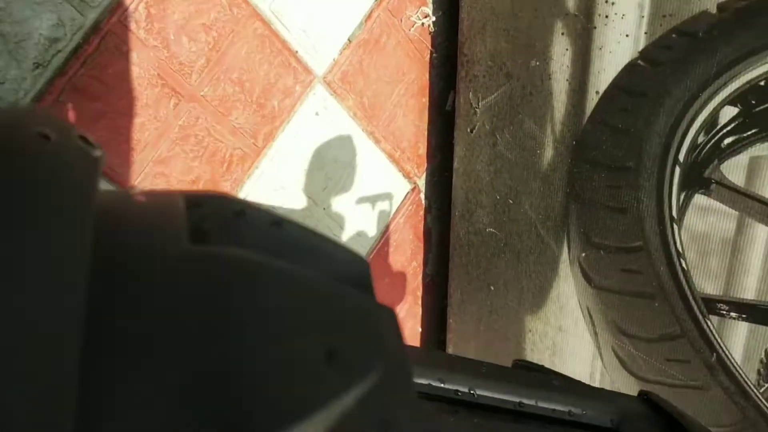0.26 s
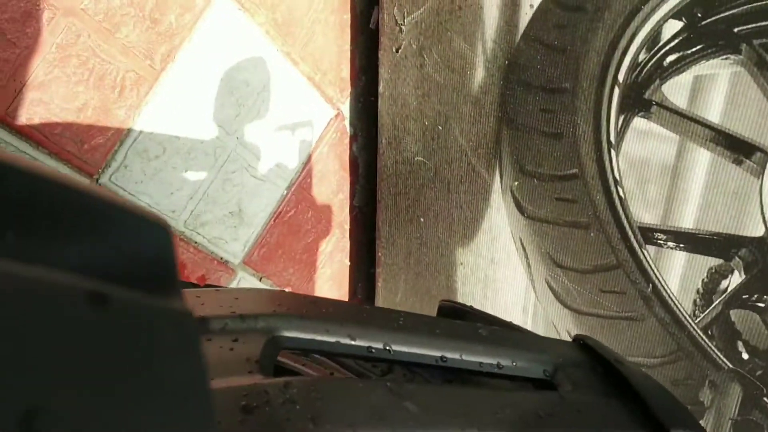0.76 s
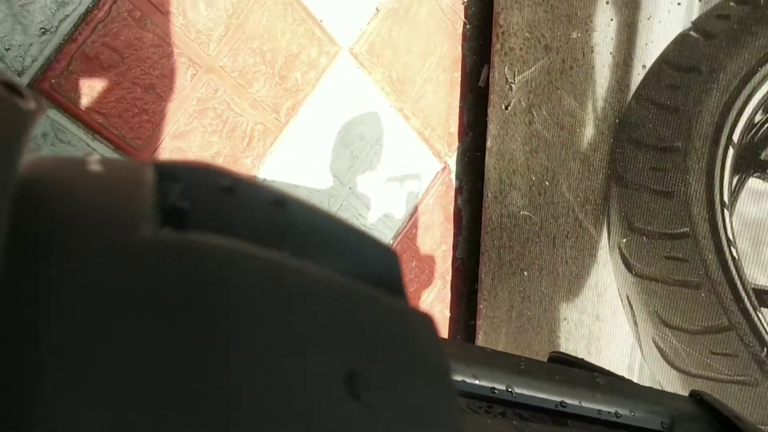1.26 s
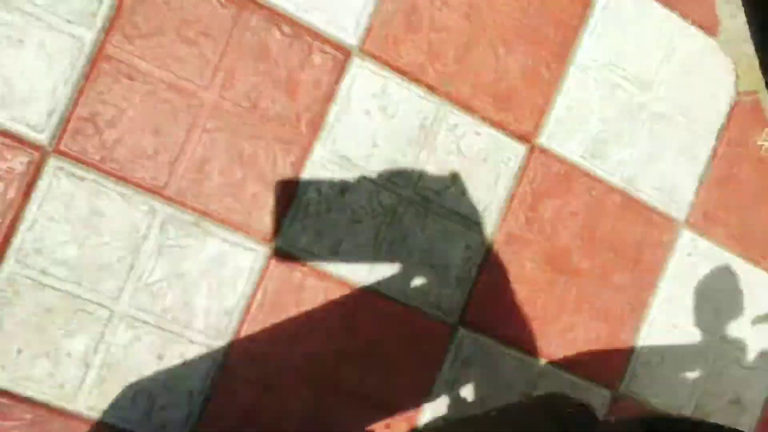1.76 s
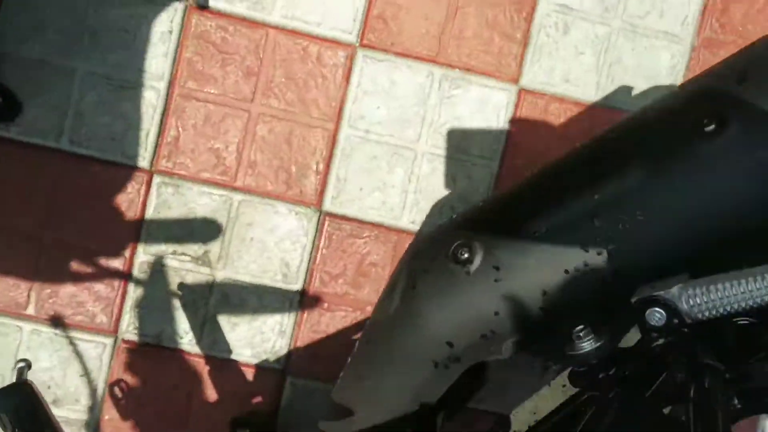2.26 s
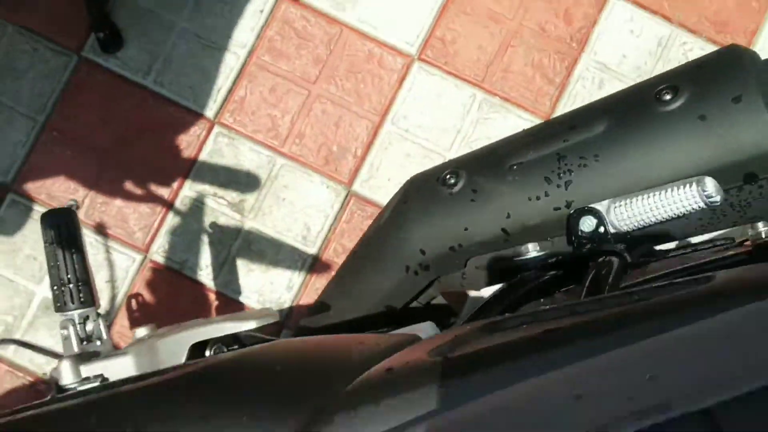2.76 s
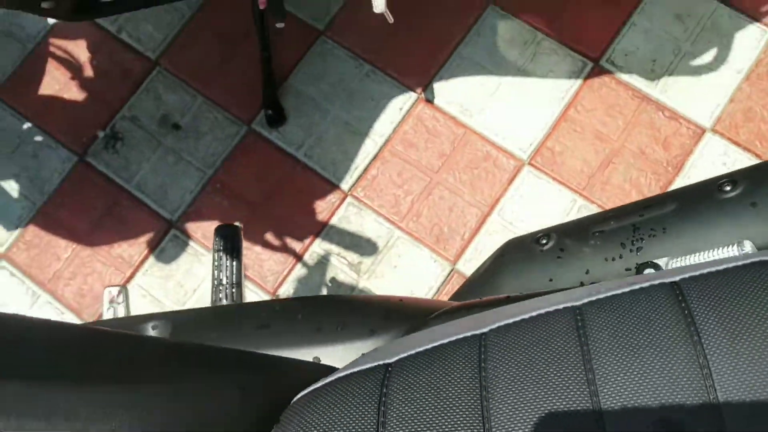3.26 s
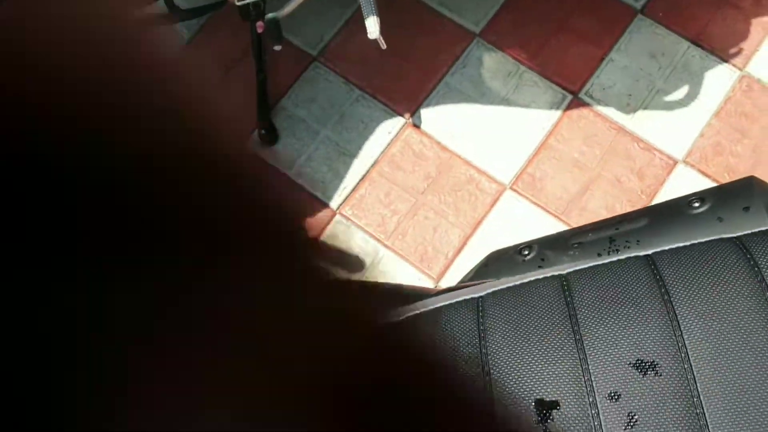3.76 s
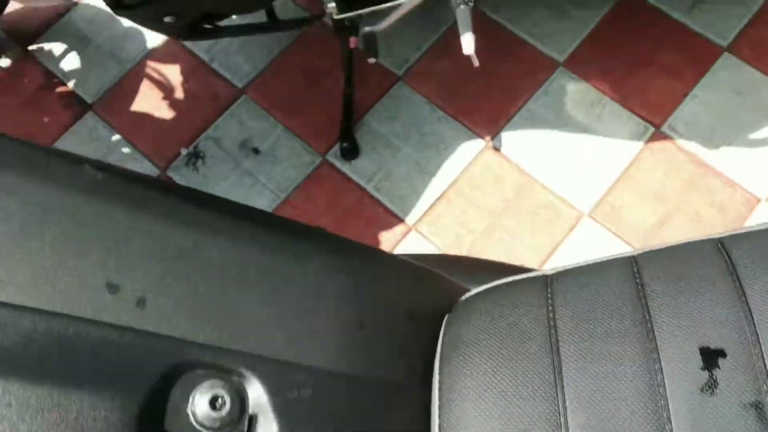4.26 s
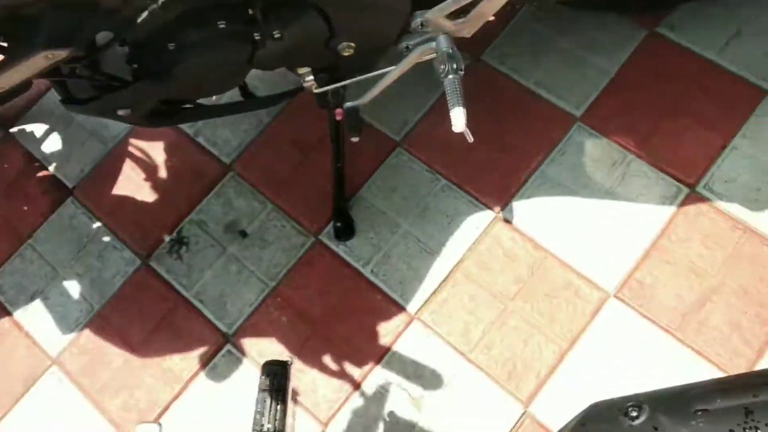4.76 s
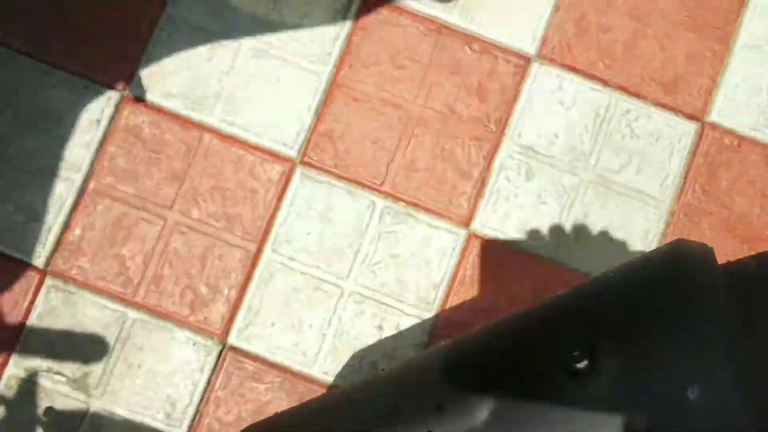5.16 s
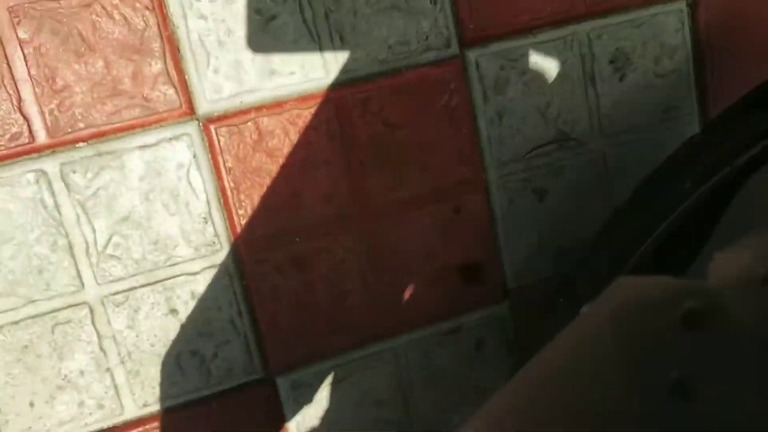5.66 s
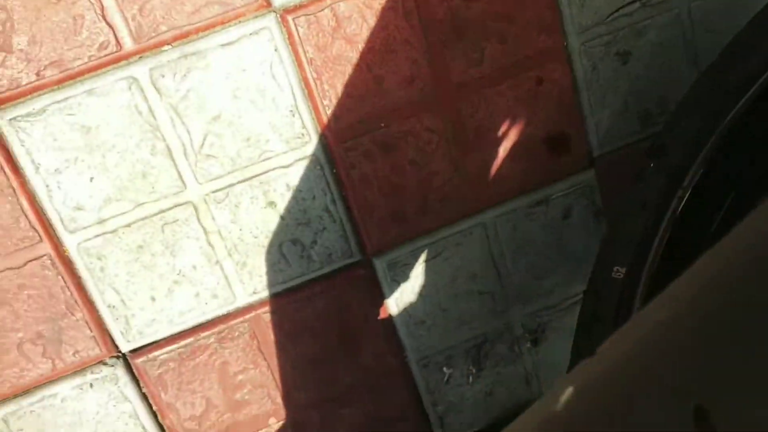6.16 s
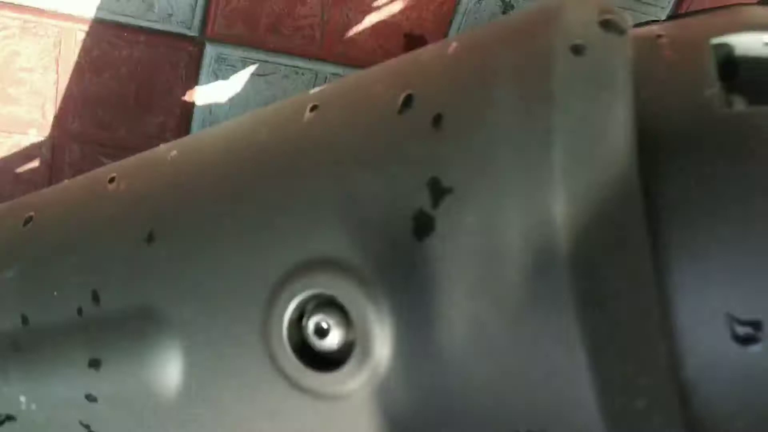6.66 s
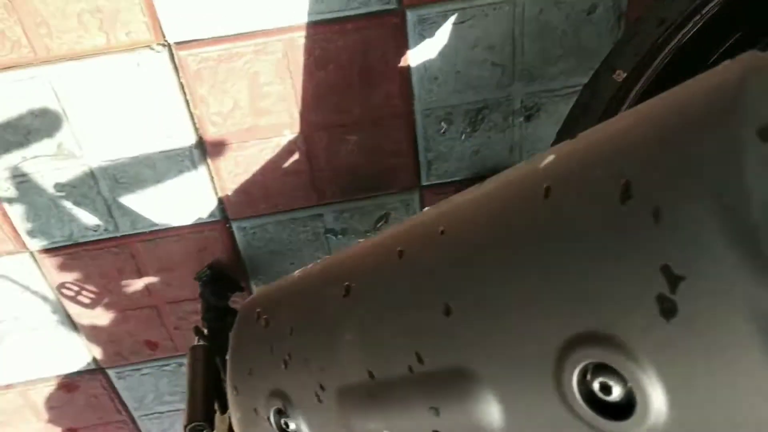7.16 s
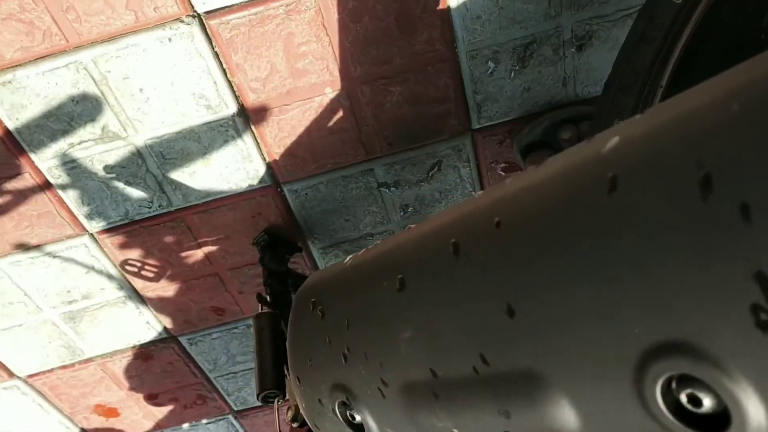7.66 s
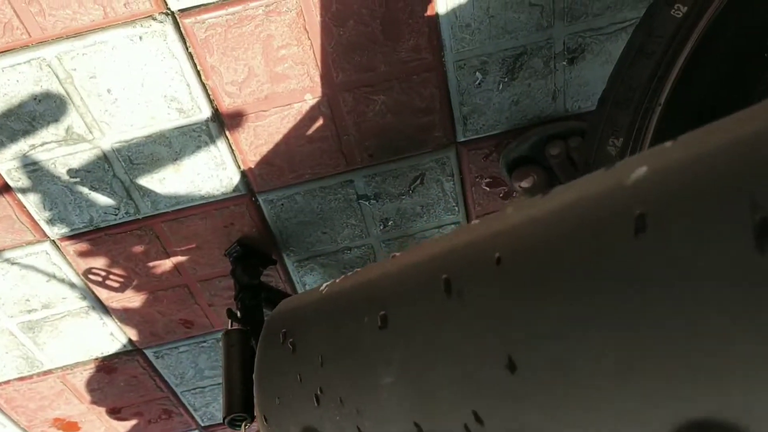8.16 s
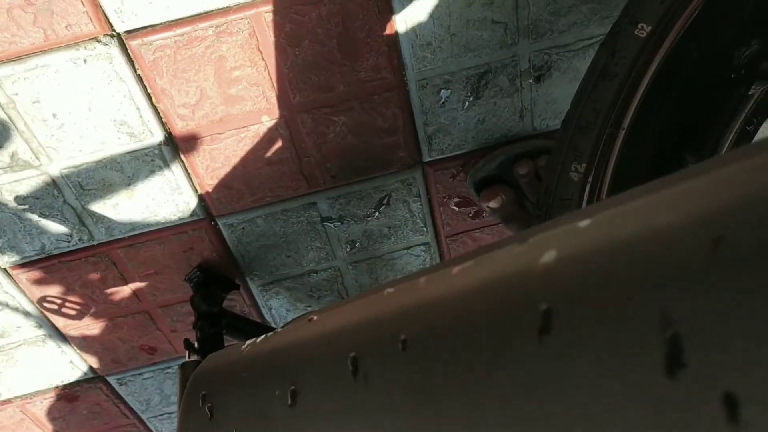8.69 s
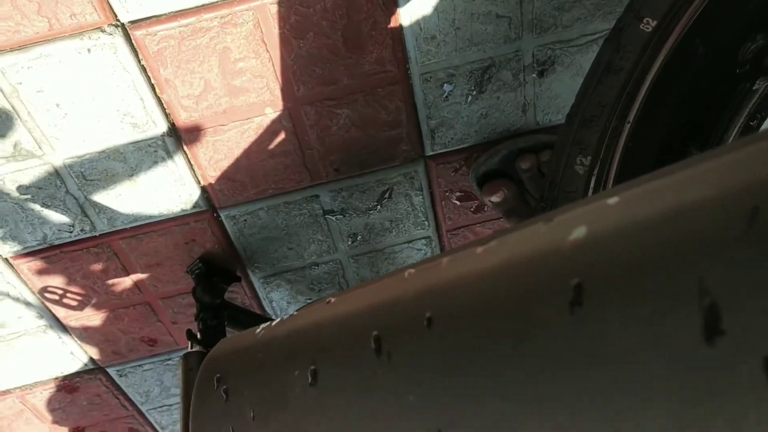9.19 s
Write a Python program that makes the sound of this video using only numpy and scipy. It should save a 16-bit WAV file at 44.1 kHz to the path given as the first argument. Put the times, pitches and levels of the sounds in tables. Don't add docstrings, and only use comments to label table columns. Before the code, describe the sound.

A motorcycle's single-cylinder exhaust thumps at a brisk idle, drops to a slow chugging tick-over, then revs up, falls back and starts rising again.

```python
import sys
import numpy as np
from scipy import signal
from scipy.fft import rfft, irfft, next_fast_len
from scipy.io import wavfile
from scipy.ndimage import uniform_filter1d, map_coordinates

SR = 44100
rng = np.random.default_rng(int(sys.argv[2]) if len(sys.argv) > 2 else 0)


def magnitude_from_level(level_db):
    exponent = np.asarray(level_db, float) / 20
    return 10 ** exponent


def file_out(sig):
    cols = np.atleast_2d(sig).T
    lim = np.clip(cols, -1, 1)
    pcm = np.round(lim * 32767).astype(np.int16)
    wavfile.write(sys.argv[1], SR, pcm)


N = 415863

# time_s, firing_rate_hz
ENGINE_SPEED = [(0, 24.149), (.8, 23.537), (1.24, 24.275), (1.66, 23.851), (2.05, 18.985), (2.07, 16.848),
                (2.52, 16.222), (4.76, 15.883), (6.16, 15.416), (7.4, 15.614), (7.62, 14.693),
                (7.64, 15.124), (8.26, 36.931), (8.5, 36.524), (8.75, 30.224), (8.91, 25.696),
                (9.18, 23.118), (9.43, 31.811)]
FIRST_FIRING_S = -.0285
STATE_STARTS = [
    -.05,
    1.79,
    2.006,
    5.255,
    7.705,
    8.397,
    8.595,
    9.047,
    9.46,
]
GLIDE_S = .008

# delay_ms, pressure
PULLING = [(-2, 0.17), (1.93, 0.18), (7, -0.26), (9.5, -0.16), (20.5, -0.034)]
FAST_IDLE = [(-2.0, 0.25), (1.98, 0.21), (6, 0.13), (9.5, 0.26), (12, 0.13)]
TICKOVER_ABOVE = [(-1.1, -.18), (8.4, -.14), (11.3, -.23), (14.5, -.07), (24.9, -.14)]
TICKOVER_BEHIND = [(-1.4, -.28), (4.1, -.17), (9.5, .26), (14.5, -.14), (21.1, -.1)]
OVERRUN = [(-2.5, -0.11), (1.5, -0.29), (8.5, -0.15)]
COASTING = [(-0.5, -0.18), (1.5, -0.29), (9.5, -0.04)]
SHUTTING = [(-1.5, -0.36), (9.5, 0.24)]
STATE_ECHOES = [FAST_IDLE, OVERRUN, TICKOVER_ABOVE, TICKOVER_BEHIND, PULLING, SHUTTING, COASTING, PULLING]

# start_db, middle_db, end_db
THUMP_LEVELS = [(-15, -13, -14.5), (-21, -27, -26.5), (-22, -22.5, -21.5), (-19.5, -20, -20.5),
                (-17.5, -15, -13.5), (-24, -20, -25), (-20, -17, -20.5), (-14, -14.5, -13)]
# time_s, level_db
EXHAUST_LOAD = [(0, -0.8), (1.9, -0.7), (2.4, -0.5), (2.8, 0.4), (3.1, 3), (3.4, 0), (3.9, -1.2),
                (4.2, -0.2), (4.6, -0.8), (5.0, -0.8), (5.4, -0.8), (5.9, 1.1), (6.4, 0.8), (7.0, -1.2),
                (7.5, -0.2), (7.8, -1.4), (8.1, 1.2), (9.43, -0.3)]
# reference_rate_hz, stretch_with_slower_crank (0-1)
ECHO_STRETCH = [(22.8, 0), (21, 0.1), (16, 0.03), (15.8, 0), (30.3, 0.31), (36, 0), (28, 0.74),
                (27.2, 0.16)]
# thump_lead_ms, turbulence_share_dying (0-1)
FIRING_PHASE = [(1.3, 0.3), (0.089, .4), (1.61, 0), (1.35, 0), (2.54, 1), (2.1, 0.6), (1.1, 0.7),
                (1.24, .6)]
# pitch_hz, width_hz, level_db
HEADER_PIPE = [(118, 25, -13.5), (133, 55, -11.5), (82.6, 12, -18), (77.6, 47, -20), (130, 43, -25),
               (150, 47, -3), (101.5, 95, -11), (120.4, 78, -15)]
# pitch_hz, width_hz, level_db
OPEN_TAILPIPE = [(265, 47, -24), (270, 46, -11), (288, 21, -17.5), (291, 26.3, -13), (274, 33, -14),
                 (266, 41, -4.5), (267, 11.3, 8), (272, 30, -10)]
# time_s, level_db against a full one
MISFIRES = [(1.311, -10)]
# time_s, level_db
RICH_CATCHES = [(2.011, -14.5), (2.066, -27), (2.185, -23), (4.166, -25), (8.519, -22)]
# pitch_hz, width_hz
SILENCER_CHAMBERS = [(201, 62), (279, 46)]
BAFFLE_HZ, BAFFLE_WIDTH_HZ, BAFFLE_SHARE = 356, 78, 0.64
# start_db, end_db
TURBULENCE_LEVELS = [(-16, -16), (-3, -3), (-3, -6), (-12.5, -12), (-13, -16), (-7, -8), (-11, -11),
                     (-14.5, -14.5)]
# pitch_hz, width_hz, level_db
TURBULENCE_MODES = [(183, 16, -4), (228.7, 31, 2), (297, 39, 3)]

# start_db, middle_db, end_db
CRACK_LEVELS = [(-37.5, -43, -43), (-34, -35, -51), (-35, -33, -33.5), (-34.5, -34.5, -36),
                (-35.5, -32, -29), (-33, -28.5, -26.5), (-31, -25.5, -29.5), (-27.5, -28, -30)]
# share_of_crack (0-1), start_hz, end_hz
SNAP_PITCH = [(.3, 450, 770), (.3, 450, 520), (.3, 452, 557), (.7, 434, 260), (.92, 430, 220),
              (.92, 420, 430), (.94, 537, 490), (.93, 510, 710)]
SNAP_RING = [0.0018, 0.0018, 0.002, 0.0013, 0.00078, 0.0023, 0.0013, 0.0021]
# delay_ms, share
SNAP_RETURN = [(10, .1), (11, .1), (13.3, 0.27), (15, 1), (11.9, .1), (12.3, 0.11), (12, 0.13), (11, .2)]

# intake_db, hiss_db, start_throb and end_throb (0-1)
AIR_FLOW = [(-30, -36, 0.07, 0.12), (-32, -37, 0, 0), (-29, -36, 0.19, 0.27), (-32.5, -36, 0.36, 0.37),
            (-31, -35, 0.37, 0), (-32.5, -37.5, 0.03, 0.034), (-33.5, -38.5, 0.01, 0.39),
            (-31.5, -37, 0.13, 0.13)]
# pitch_hz, density_db (per Hz)
INTAKE_SPECTRUM = [(290, -3), (500, -8), (661, -13.5), (749, -9), (1100, -11), (2730, -8.5), (3530, -15),
                   (5000, -18), (6500, -20), (11000, -120)]
# pitch_hz, density_db (per Hz)
HISS_SPECTRUM = [(1470, -11), (2500, -39), (2760, -8.5), (3820, -17.5), (4450, -6.5), (6010, -12),
                 (8250, -10.5), (14800, -17.5), (15100, -9), (15700, -40)]
# time_s, pitch_hz, song_db, intake_left_right_db
AIR_BOX_SONG = [(0, 900, -62, 2.5), (1.8, 877, -57, 1), (1.97, 866, -36, 1), (2.08, 831, -30.5, 0.5),
                (2.6, 769.4, -34.5, 0), (3.4, 760, -39.5, 5), (3.9, 742, -35, 3), (4.45, 737, -31, -1.5),
                (5.0, 794, -45, -2), (5.5, 892.5, -42.5, -5), (7.5, 933.5, -45, -5), (8.24, 1028, -39, -2),
                (8.37, 1035, -25.5, -3), (8.52, 1017, -38, -4), (8.7, 1018, -41, -1.5),
                (9.43, 1040, -38, 0.5)]
BOX_LOW_RATIO, BOX_LOW_DB = .68, -1.5
CHUFF_START, CHUFF_RISE, CHUFF_FALL, CHUFF_REST = -0.256, 0.085, 0.12, 0.11

# pitch_hz, width_hz, level_db
HEAD_MODES = [(1040, 20, 10), (1734, 33, 8.5), (2840, 120, 1.5), (3335, 23, 3.5), (3530, 73, 1),
              (5100, 520, -1.5)]
# pitch_hz, width_hz, level_db
FIN_MODES = [(1844, 20, 7), (2074, 26, 7.5), (2315, 37, 1.5), (4580, 18, 3), (4950, 270, 2),
             (7360, 120, 2.5), (7570, 210, -5), (8080, 440, 7), (10470, 150, -5)]
# time_s, casing_db, head_db, valve_tap_db
METAL_LEVELS = [(0, -36.5, -30, -4.5), (1.0, -37, -25.5, -7), (1.9, -33.5, -32.5, -3), (4.0, -44, -11, -46),
                (5.5, -42.5, -19, -27), (7.6, -41.5, -26.5, -11), (8.3, -33, -49, 17.5),
                (8.8, -38.5, -33, -3.5), (9.43, -31, -49, 17)]
# share_of_cycle, level_db
VALVE_TAPS = [(.02, -0.5), (0.429, 1), (.86, 0.5)]
# time_s, peak_db
LOOSE_KNOCKS = [(1.205, -10), (1.245, -11), (1.319, -8.5), (1.326, -7), (1.8665, -15), (2.86, -28),
                (4.211, -18), (4.4034, -14), (8.871, -24), (8.987, -23), (9.029, -25), (9.378, -29)]
# pitch_hz, width_hz, level_db
KNOCK_MODES = [(1080, 270, -4), (1830, 360, 1.5), (3060, 300, -5), (5000, 1100, -10)]
# start_s, length_s, pitch_hz, width_hz, level_db
PANEL_BUZZES = [(-0.15, 0.79, 2805, 130, -34), (0.15, 0.24, 1750, 120, -40), (0.3, 0.82, 7270, 250, -43),
                (0.41, 0.66, 3580, 150, -40), (0.57, 0.52, 4560, 130, -40), (0.71, 0.45, 5060, 200, -38),
                (0.72, 0.33, 1750, 120, -39), (1.11, 0.53, 3200, 220, -38), (1.488, 0.45, 2830, 115, -36.5),
                (3.51, 0.96, 1700, 1600, -42.5), (3.794, 0.35, 2710, 190, -38),
                (4.0, 0.71, 513, 110, -39.5), (4.51, 0.87, 7550, 1110, -42), (5.01, 2.0, 4730, 210, -60),
                (5.61, 0.5, 455, 92, -35.5), (5.81, 0.45, 1800, 91, -48), (6.45, 0.6, 6800, 710, -44),
                (5.4, 2.9, 9500, 2600, -52), (8.02, 0.5, 2600, 1800, -39), (8.01, 0.39, 4300, 1500, -53),
                (8.41, 0.2, 850, 70, -39), (8.3, 0.36, 2090, 90, -43), (8.51, 0.27, 2970, 400, -45),
                (9.25, 0.19, 4630, 135, -41)]
# time_s, peak_db, pitch_hz
FIN_TICKS = [(0.4269, -18, 5000), (0.5556, -20, 7200), (0.6389, -22, 5170), (0.6828, -27, 4500),
             (0.7262, -20, 4570), (0.7657, -20, 4580), (0.852, -19, 4600), (0.8926, -21, 4640),
             (0.9355, -19, 7300), (0.9762, -30, 5130), (1.0196, -27, 7360), (1.061, -18, 5190),
             (1.1013, -18, 4580), (1.1862, -19.5, 7350), (1.2271, -23, 7210), (1.268, -21, 4990),
             (2.0098, -24, 4200), (2.2413, -22, 7200), (2.8549, -24, 5720), (4.6016, -18, 6500),
             (4.917, -21, 7410), (5.4888, -24, 8200), (5.6171, -22, 6840), (5.745, -20, 6940),
             (6.5817, -26, 8220), (6.6478, -30, 4510), (6.7133, -17, 5170), (6.779, -19, 7360),
             (6.905, -26, 4580), (7.1626, -31, 4600), (7.6824, -33, 5000), (7.792, -19, 7350),
             (7.9239, -17, 8770), (7.9982, -24, 8860), (8.0671, -26, 4590), (8.1, -18, 4870),
             (8.1638, -17, 4650), (8.2801, -25, 5500), (8.9503, -25, 4450), (8.991, -27, 5020),
             (9.0327, -27, 8420), (9.281, -19, 4570), (9.346, -16.5, 4580), (9.3816, -20, 4580)]
# time_s, peak_db, pitch_hz
FAST_PINGS = [(0.1371, -37, 3200), (0.213, -31, 3250), (0.2574, -24, 3530), (0.2953, -27, 3300),
              (0.431, -32, 3550), (0.4868, -28, 3250), (0.5183, -32, 3320), (0.5592, -31, 3590),
              (0.5961, -30, 3360), (0.6435, -26, 3590), (0.6834, -31, 3590), (0.7268, -29, 3450),
              (0.7797, -26, 3570), (0.8091, -34, 3320), (0.857, -30, 3590), (0.9009, -37, 3610),
              (0.9732, -35, 3470), (1.0216, -32, 3300), (1.058, -32, 3430), (1.1518, -27, 3290),
              (1.1892, -30, 3350), (1.2411, -24, 3310), (1.286, -28, 3310), (1.3259, -17, 3300),
              (1.4008, -29, 3600), (1.519, -29, 3270)]
# time_s, peak_db, pitch_hz
SLOW_PINGS = [(5.2844, -33, 5300), (5.3502, -35, 4340), (5.4176, -40, 4540), (5.4884, -37, 5200),
              (5.5582, -35, 4630), (5.6122, -37, 4530), (5.7558, -32, 4620), (5.8725, -33, 4590),
              (6.1314, -35, 4630), (6.1964, -30, 4550), (6.2437, -37, 4680), (6.3115, -35, 4600),
              (6.3664, -34, 4360), (6.4942, -40, 4900), (6.5824, -36, 5260), (6.6473, -34, 4520),
              (6.7136, -35, 5170), (6.776, -32, 4950), (6.8318, -37, 5180), (6.9062, -33, 4580),
              (6.9616, -35, 4340), (7.0229, -34, 4920), (7.1616, -34, 4580), (7.2085, -39, 4300),
              (7.3003, -37, 4520), (7.3557, -27, 4580), (7.4774, -38, 4300), (7.5577, -35, 4580),
              (7.6071, -39, 5160), (7.6824, -35, 4950)]
TICK_DB, PING_DB, TICK_DECAY_S = -10, -2.5, 0.0089

# time_s, air_flow_db, tailpipe_left_right_db
MICROPHONE_PATH = [(0, 4, -0.5), (.6, -1.5, -3), (1.35, 1.5, -2), (1.9, 3, -1.2), (2.2, 3, -0.5),
                   (3.5, -1, -1), (4.05, -1, -0.5), (4.45, -2.5, -3), (5.1, -0.5, -1), (6.2, -3.5, 3),
                   (6.8, -1.5, -1.5), (7.5, -2.5, 1), (7.8, 0.5, 0.5), (8.05, 1, 4), (8.28, 6.5, 4.5),
                   (8.75, 2, 7), (9.11, 0.5, 4.5), (9.43, 3.5, 6.5)]
# time_s, lag_ms
PORT_LAG = [(0, .32), (4.4, .26), (5.0, -.24), (9.43, -.24)]
# pitch_hz, density_db (per Hz)
RUMBLE_SPECTRUM = [(12, -56), (20, -26), (43, -13), (130, 9), (170, -37), (290, -120)]
RUMBLE_DB = -52.5
PATCHY_DB, PATCH_HZ, PATCH_S = 1.5, 1980, .09
NOTCH_DB, NOTCH_HZ, NOTCH_S, NOTCH_FROM_HZ = 4.5, 130, .04, 6000


def rms_one(x):
    return x / np.sqrt(np.mean(x ** 2) + 1e-20)


def in_time(rows):
    s, *columns = np.transpose(rows)
    return [np.interp(np.arange(N) / SR, s, column) for column in columns]


def by_state(rows):
    s = [np.linspace(start + GLIDE_S, end - GLIDE_S, len(rows[0]))
         for start, end in zip(STATE_STARTS, STATE_STARTS[1:])]
    return np.interp(np.arange(N) / SR, np.ravel(s), np.ravel(rows))


def held(values):
    return by_state(np.transpose([values, values]))


def resonate(x, hz, width_hz):
    r = np.exp(-np.pi * width_hz / SR)
    poles = [1, -2 * r * np.cos(2 * np.pi * hz / SR), r * r]
    return signal.lfilter([(1 - r * r) / 2, 0, (r * r - 1) / 2], poles, x + 1e-18)


def rings(drive, modes):
    return rms_one(sum(magnitude_from_level(db) * resonate(drive, hz, width_hz) / np.sqrt(width_hz)
                       for hz, width_hz, db in modes))


def band(x, low_hz, high_hz):
    return signal.sosfilt(signal.butter(2, [low_hz, high_hz], "band", fs=SR, output="sos"), x)


def at_ports(x, lag_ms):
    n, half = np.arange(N), lag_ms * SR / 2000
    return np.array([np.interp(n - half, n, x), np.interp(n + half, n, x)])


def coloured(spectrum, alike, lag_ms):
    size = next_fast_len(N)
    hz, points = np.arange(size // 2 + 1) * SR / size + 1, np.array(spectrum)
    shape = magnitude_from_level(np.interp(np.log(hz), np.log(points[:, 0]), points[:, 1], left=-90, right=-90))
    common, *own = irfft(rfft(rng.standard_normal((3, size))) * shape, size)[:, :N]
    return rms_one(alike * at_ports(common, lag_ms) + np.array(own))


def firings():
    turns = np.cumsum(in_time(ENGINE_SPEED)[0]) / SR - FIRST_FIRING_S * ENGINE_SPEED[0][1]
    inside = np.interp(np.arange(1, int(turns[-1]) + 1), turns, np.arange(N) / SR)
    return turns, np.r_[FIRST_FIRING_S, inside, 2 * inside[-1] - inside[-2]]


def burst(turns, start, rise, fall, spread_db):
    cycle, share = np.divmod(turns - start + 1, 1)
    shape = (1 - np.exp(-share / rise)) * np.exp(-share / fall)
    shape = shape * np.minimum(1, 20 * (1 - share))
    shape = shape * magnitude_from_level(spread_db * rng.standard_normal(256))[cycle.astype(int)]
    return shape / shape.mean()


def rumble(lag_ms):
    return magnitude_from_level(RUMBLE_DB) * coloured(RUMBLE_SPECTRUM, 1.4, lag_ms)


def field(shape, across, along):
    spots = np.meshgrid(np.arange(shape[0]) / across, np.arange(shape[1]) / along, indexing="ij")
    return map_coordinates(rng.standard_normal((300, 300)), spots, order=1, mode="wrap")


def patchy(x):
    turn = np.array([[1, 0.92], [1, -1.04]]) / np.sqrt(2)
    hz, s, z = signal.stft(turn @ x, SR, nperseg=1024)
    frame_rate = SR / 512
    swell = PATCHY_DB * field(z.shape[1:], PATCH_HZ / hz[1], PATCH_S * frame_rate)
    dips = [np.maximum(field(z.shape[1:], NOTCH_HZ / hz[1], NOTCH_S * frame_rate) + .45, 0) for side in z]
    reach = np.clip(hz / NOTCH_FROM_HZ, 0, 1)[:, None] ** 2
    gain = magnitude_from_level(reach * (swell - NOTCH_DB * 2 * np.array(dips) ** 2))
    return turn @ signal.istft(z * gain, SR)[1][:, :N]


def panels(turns):
    out = np.zeros((2, N))
    shake = burst(turns, -0.098, 0.016, 0.36, spread_db=1.3)
    drive = shake * (rng.standard_normal(N) + 1.13 * rng.standard_normal((2, N)))
    for s, length, hz, width_hz, db in PANEL_BUZZES:
        at = slice(max(0, int(s * SR)), int((s + length) * SR))
        share = np.clip((np.arange(N)[at] / SR - s) / length, 0, 1)
        buzz = rms_one(resonate(resonate(drive[:, at], hz, width_hz), hz, 3 * width_hz))
        out[:, at] += magnitude_from_level(db) * buzz * np.sqrt(np.sin(np.pi * share) + 1e-9)
    return out


def ticks():
    out, t = np.zeros((2, N + 1500)), np.arange(1500) / SR
    pings = [(s, db + PING_DB - TICK_DB, hz) for s, db, hz in FAST_PINGS + SLOW_PINGS]
    envelope = np.exp(-t / TICK_DECAY_S) * np.minimum(1, t / 0.00081)
    for (s, peak_db, hz), phase in zip(FIN_TICKS + pings, rng.uniform(-1.1, 1.1, (128, 2, 1))):
        at = int(s * SR)
        out[:, at:at + 1500] += magnitude_from_level(peak_db + TICK_DB) * np.sin(2 * np.pi * hz * t + phase) * envelope
    return out[:, :N]


def loose_knocks():
    knocks = np.zeros(N)
    for s, peak_db in LOOSE_KNOCKS:
        at = int(s * SR)
        knocks[at:at + 441] += magnitude_from_level(peak_db + 1.0) * np.exp(-np.arange(441) / 71.0)
    jolt = knocks * (rng.standard_normal(N) + 0.34 * rng.standard_normal((2, N)))
    return 1.8 * sum(magnitude_from_level(db) * resonate(jolt, hz, width_hz) for hz, width_hz, db in KNOCK_MODES)


def casing(turns):
    casing_db, head_db, tap_db = in_time(METAL_LEVELS)
    rattle = rng.standard_normal((2, N)) * magnitude_from_level(1.3 * np.minimum(rng.exponential(1, N), 4))
    taps = sum(magnitude_from_level(db) * burst(turns, share, .006, .07, spread_db=2.5) for share, db in VALVE_TAPS)
    shaken = 1 + burst(turns, -.03, .02, .2, spread_db=3.0)
    fins = rings(rattle * shaken, FIN_MODES)
    head = rings(rattle[::-1, ::-1] * (0.22 + magnitude_from_level(tap_db) * taps), HEAD_MODES)
    return magnitude_from_level(casing_db) * fins + magnitude_from_level(head_db) * head + loose_knocks()


def air_box(turns, box_hz, depth):
    slow = signal.sosfilt(signal.butter(2, 105.0, fs=SR, output="sos"), rng.standard_normal((2, 2, N)))
    slow = rms_one(slow) + np.reshape([1.9, 0], (2, 1, 1))
    angle = 2 * np.pi * np.cumsum(box_hz) / SR
    gulp_number = (turns - CHUFF_START + 1).astype(int)
    angle = angle + rng.uniform(0, 2 * np.pi, 256)[gulp_number]
    box = rms_one(slow[0] * np.cos(angle) + slow[1] * np.sin(angle))
    low_angle = BOX_LOW_RATIO * angle
    low = rms_one((slow[1] + 1) * np.cos(low_angle) + slow[0, ::-1] * np.sin(low_angle))
    box = box + magnitude_from_level(BOX_LOW_DB) * low * depth * 2
    strokes = np.minimum(1, 2.6 * depth)
    chuff = CHUFF_REST + burst(turns, CHUFF_START, CHUFF_RISE, CHUFF_FALL, spread_db=.9)
    return rms_one(box * (1 - strokes + strokes * chuff))


def intake(turns, intake_db, depth, lag_ms):
    gulp = 1 - depth + depth * burst(turns, -0.31, 0.11, 0.18, spread_db=1.4)
    box_hz, song_db, pan_db = in_time(AIR_BOX_SONG)
    song = magnitude_from_level(song_db) * air_box(turns, box_hz, depth)
    rush = rms_one(coloured(INTAKE_SPECTRUM, 0.51, lag_ms) * gulp) * magnitude_from_level([pan_db / 2, -pan_db / 2])
    return magnitude_from_level(intake_db) * rush + song


def hiss(turns, hiss_db, depth, lag_ms):
    jet = burst(turns, -0.13, 0.041, 0.22, spread_db=1.6)
    noise = coloured(HISS_SPECTRUM, 0.1, lag_ms)
    body = band(noise, 2900, 10600)
    edges = (noise - body) * (1 - .75 * depth * (1 - jet))
    return magnitude_from_level(hiss_db) * rms_one(body * (1 - depth + depth * jet) + edges)


def crack(turns, fired, crack_db, lag_ms):
    snap, t = np.zeros(N + 2000), np.arange(1000) / SR
    pitch = np.array(SNAP_PITCH)
    sharp, snap_hz = np.clip(held(pitch[:, 0]), 0, .95), by_state(pitch[:, 1:])
    ring_s = held(SNAP_RING)
    back_ms, back = [held(column) for column in np.transpose(SNAP_RETURN)]
    for s, gap, chance in zip(fired[1:-1], np.diff(fired), rng.standard_normal(256)):
        at = int(s * SR + 20.0)
        ring = ring_s[at]
        envelope = np.exp(-t / ring) * np.minimum(1, t / (0.2 * ring)) / np.sqrt(ring)
        pop = magnitude_from_level(.8 * chance) * np.sqrt(gap) * np.cos(2 * np.pi * snap_hz[at] * t) * envelope
        snap[at:at + 1000] += pop
        late = at + int(back_ms[at] * SR / 1000)
        snap[late:late + 1000] += back[at] * pop
    snap = band(snap[:N], 273, 2000)
    snap = snap / np.sqrt(uniform_filter1d(snap ** 2, size=8000) + 1e-12)
    rush = rng.standard_normal((3, N))
    throb = 0.94 + 0.15 * burst(turns, -0.15, 0.041, 0.2, spread_db=6.0)
    bed = rms_one(band(rush[0] + 0.81 * rush[1:], 396, 1050) * throb)
    return magnitude_from_level(crack_db) * (sharp * at_ports(snap, lag_ms) + np.sqrt(1 - sharp ** 2) * bed)


def silencer(x):
    x = signal.fftconvolve(x, np.hanning(150), "same")
    for hz, width_hz in SILENCER_CHAMBERS:
        x = resonate(x, hz, width_hz)
    return x - BAFFLE_SHARE * resonate(x, BAFFLE_HZ, BAFFLE_WIDTH_HZ)


def spent_gas(echoes, at, sizes, length, stretch=1):
    train = np.zeros(length)
    for ms, pressure in echoes:
        spot = ((at + stretch * ms / 1000) * SR).astype(int)
        inside = (spot >= 0) & (spot < length)
        np.add.at(train, spot[inside], (pressure * sizes)[inside])
    return train


def loudness(echoes):
    one_firing = spent_gas(echoes, np.array([.02]), np.ones(1), 8192)
    return np.sqrt(np.sum(silencer(one_firing) ** 2))


def turbulence(turns, level_db):
    swirl = rings(rng.standard_normal((2, N)), TURBULENCE_MODES)
    dying = np.clip(held(np.array(FIRING_PHASE)[:, 1]), 0, .95)
    gate = 1 - dying + dying * burst(turns, -0.016, 0.15, 0.43, spread_db=0.5)
    swirl = rms_one(band(swirl, 183, 345)) * gate
    return swirl * magnitude_from_level(level_db + by_state(TURBULENCE_LEVELS) - 0.5)


def exhaust(turns, fired, lag_ms, pan_db):
    strength = magnitude_from_level(.6 * rng.standard_normal(len(fired))) * np.sqrt(np.gradient(fired) * SR)
    for when, drop_db in MISFIRES:
        strength[np.argmin(abs(fired - when))] *= magnitude_from_level(drop_db)
    train, header, tail = np.zeros(N), np.zeros(N), np.zeros(N)
    level_db = by_state(THUMP_LEVELS) + in_time(EXHAUST_LOAD)[0]
    thumps = strength * magnitude_from_level(np.interp(fired, np.arange(N) / SR, level_db))
    states = zip(STATE_ECHOES, STATE_STARTS, STATE_STARTS[1:], HEADER_PIPE, ECHO_STRETCH, FIRING_PHASE,
                 OPEN_TAILPIPE)
    for echoes, start, end, header_mode, (rate, tied), (lead_ms, _), tail_mode in states:
        now = (fired > start) & (fired <= end)
        stretch = (rate * np.gradient(fired)[now]) ** tied
        train += spent_gas(echoes, fired[now] - lead_ms / 1000, thumps[now] / loudness(echoes), N, stretch)
        hz, width_hz, db = header_mode
        slugs = spent_gas([(-1.71, 1.0)], fired[now], strength[now] * magnitude_from_level(db), N)
        header += resonate(resonate(slugs, hz, width_hz), hz, 12.6 * width_hz)
        hz, width_hz, db = tail_mode
        slugs = spent_gas([(0.3, -0.67)], fired[now], strength[now] * magnitude_from_level(db), N)
        tail += resonate(slugs, hz, width_hz)
    rich_s, rich_db = np.transpose(RICH_CATCHES)
    train += spent_gas(FAST_IDLE, rich_s, magnitude_from_level(rich_db) * np.sqrt(SR / 24) / loudness(FAST_IDLE), N)
    swirl = turbulence(turns, level_db)
    pipe = band(silencer(train), 151, 1260) + band(tail, 157, 950) + header + swirl[0]
    ports = at_ports(pipe, lag_ms) + 0.068 * swirl[1] * [[1], [-1]]
    return ports * magnitude_from_level([pan_db / 2, -pan_db / 2])


def scene():
    turns, fired = firings()
    lag_ms = in_time(PORT_LAG)[0]
    flow_db, pan_db = in_time(MICROPHONE_PATH)
    intake_db, hiss_db, *throb = np.transpose(AIR_FLOW)
    depth = np.clip(by_state(np.transpose(throb)), 0, .95)
    pipe = exhaust(turns, fired, lag_ms, pan_db) + crack(turns, fired, by_state(CRACK_LEVELS), lag_ms)
    air = hiss(turns, held(hiss_db) + flow_db, depth, lag_ms)
    air = air + intake(turns, held(intake_db) + flow_db, depth, lag_ms)
    metal = casing(turns) + panels(turns)
    return pipe + patchy(air + metal) + ticks() + rumble(lag_ms)


def low_pass(x):
    return signal.sosfilt(signal.butter(12, 15900, fs=SR, output="sos"), x)


def record(dry):
    mix = 1.68 * np.tanh(dry / 1.725)
    return low_pass(mix)


dry = scene()
out = record(dry)
file_out(out)
```